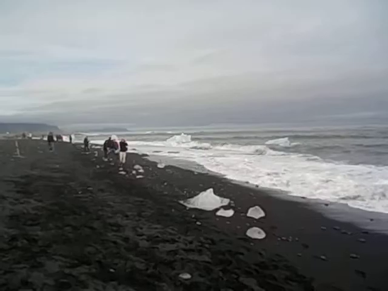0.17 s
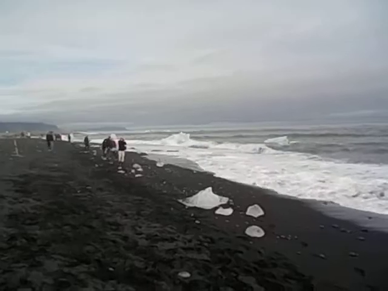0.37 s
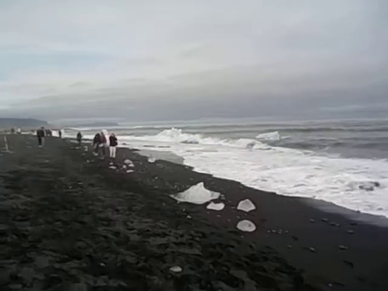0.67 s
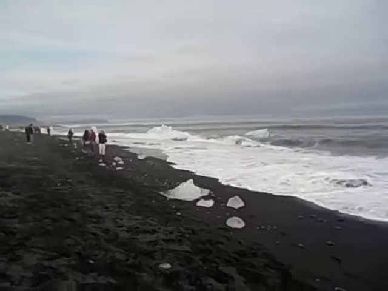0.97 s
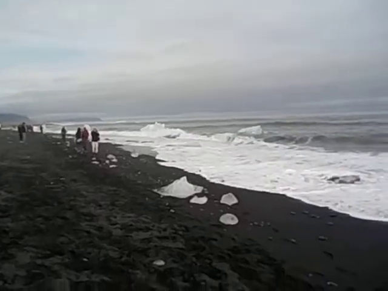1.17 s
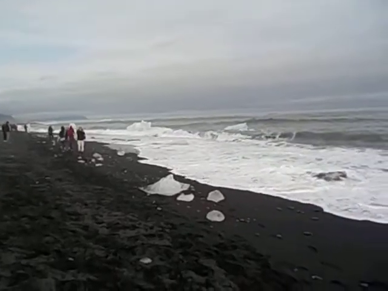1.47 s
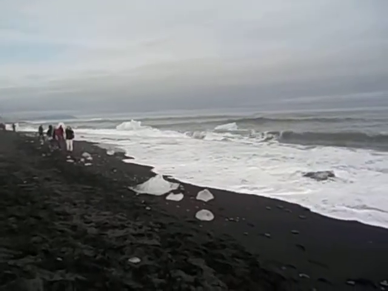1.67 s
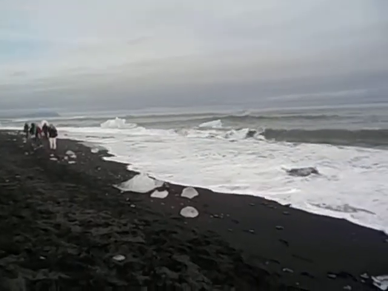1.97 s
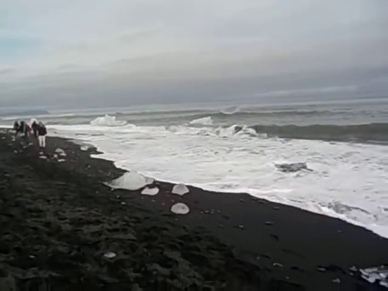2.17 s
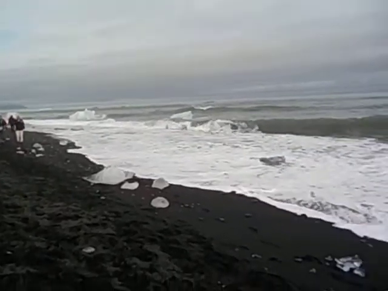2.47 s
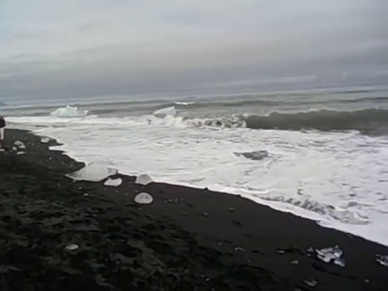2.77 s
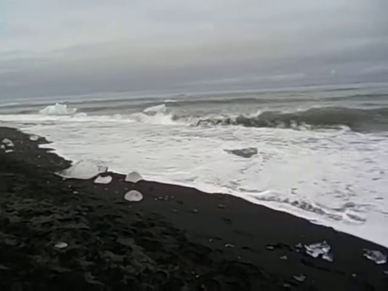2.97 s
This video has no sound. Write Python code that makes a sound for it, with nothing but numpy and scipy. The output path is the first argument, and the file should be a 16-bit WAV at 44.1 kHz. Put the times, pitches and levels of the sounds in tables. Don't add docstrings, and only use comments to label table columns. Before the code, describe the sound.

Ocean surf roars steadily on a sand beach, with foamy wash, fizz and watery slaps.

```python
import sys
import numpy as np
from scipy import signal
from scipy.fft import rfft, irfft
from scipy.io import wavfile
from scipy.ndimage import uniform_filter1d

SR = 44100
rng = np.random.default_rng(int(sys.argv[2]) if len(sys.argv) > 2 else 0)


def ratio_of_db(decibels):
    return 10 ** (np.asarray(decibels, float) / 20)


def unload_audio(sound):
    columns = np.transpose(np.atleast_2d(sound))
    steps = np.round(np.clip(columns, -1, 1) * 32767)
    wavfile.write(sys.argv[1], SR, steps.astype(np.int16))


N = 137151

# (time [s], level [dB])
BREAKER_SURGE = [(.2, -36), (0.271, -32.5), (.42, -35), (.68, -33.5), (.8, -35), (1.0, -36), (1.2, -35.5),
                 (1.28, -34.5), (1.4, -35.5), (1.55, -34), (1.7, -34), (2.15, -34.6), (2.23, -38.5),
                 (2.35, -34), (2.6, -35.5), (2.9, -36), (3.03, -35.5), (3.11, -31.5)]
# (frequency [Hz], density [dB per Hz])
ROAR_SPECTRUM = [(25, -56), (60, -49), (120, -26), (250, -12.5), (450, -2), (750, -.6), (1200, -4.5),
                 (2500, -22.5)]
WASH_SPECTRUM = [(500, -20.5), (1200, -4.5), (2000, -10.5), (2800, -8), (4300, -21.5), (5300, -14),
                 (6300, -22.5), (7700, -37)]
FIZZ_SPECTRUM = [(7700, -34), (8700, -34.5), (9200, -34.5), (11000, -32.5), (13500, -31.5), (14500, -31),
                 (15300, -32.5), (15750, -39)]
# (frequency [Hz], coherence [0-1])
COHERENCE = [(400, .9995), (1000, .996), (1500, .965), (1900, .8), (2300, .96), (3000, .96), (4000, .8),
             (5100, .93)]
COHERENCE_HIGH = [(5100, 1), (6500, .72), (9200, .66), (14000, .66), (15000, .25)]
# (frequency [Hz], phase [rad])
PHASE_LEAD = [(800, .01), (2500, 0.45), (3000, 0.23), (4500, -0.59), (5300, 0.85), (6100, 0.75), (7000, .1),
              (9000, 1)]
# (frequency [Hz], difference [dB])
PORT_BALANCE = [(1000, 0), (1700, 1.7), (2200, -1.8), (2750, -4.5), (3500, -1.5), (4200, -5), (4850, 3.3),
                (5500, 2)]
PORT_BALANCE_HIGH = [(5500, 0), (6400, -6), (7000, -7.5), (9000, -2)]
# (frequency [Hz], width [Hz], amplitude left over [0-1])
NOTCHES = [(1767, 150, 0), (2521, 310, 0.02), (4950, 204, 0.16)]
# (time [s], peak level [dB], pitch [Hz])
WATER_SLAPS = [
    (0.314, -27, 1080),
    (0.502, -28, 880),
    (0.682, -23.5, 1130),
    (1.529, -24, 890),
    (1.632, -26, 754),
    (2.964, -22, 1240),
    (3.032, -24.5, 1140),
    (3.065, -18, 1400),
    (3.088, -24, 1190),
]
# (frequency [Hz], density [dB per Hz])
AMPLIFIER_SPECTRUM = [(30, 9), (150, 25), (400, 22), (1000, 5), (6000, -3), (15700, 1)]

SURGE_SHARE = (1.0, 0.36, 0.16)
DRIFT_DB_PER_S = (-0.7, -0.3, 0.6)
PATCH_DB, FLICKER_DB, SWAY_DB = (.9, 1.1, .7), (.9, 1.0, .6), (.4, .5, .5)
RUMBLE_DRIFT_DB_PER_S, RUMBLE_HZ = -2.5, 208
SPENT_DB, SPENT_S = 1.5, 0.23
WATER_ABOVE_SURGE_DB = 0.5

BUBBLES_PER_S, BUBBLE_SPREAD_DB, BUBBLE_DB = 1500, 2.5, -9
BUBBLE_LOW_HZ, BUBBLE_HIGH_HZ, BUBBLE_CYCLES, BUBBLE_GLIDE = 452, 3520, 4.7, .15
SLAP_CYCLES, SLAP_GAIN_DB, SLAP_LOW_HZ = 2.2, -2.0, 500

LEAD_RAD_PER_KHZ, LEAD_TOP_HZ = .45, 13000
TURN_DB_PER_S, TURN_HZ = -2, 1500
GAP_HZ, GAP_HALF_HZ = 7740, 950
START_S, FADE_END_S, FADE_FROM_DB = 0.072, .22, -39.5
SELF_NOISE_DB = -78


def evened(x):
    return x / np.sqrt(np.mean(x ** 2) + 1e-20)


def read(points, hz, beyond=None):
    f, value = np.transpose(points)
    return np.interp(np.log(hz + 1), np.log(f + 1), value, beyond, beyond)


def blurred(shape, bins, frames):
    z = uniform_filter1d(rng.standard_normal(shape), max(round(bins), 1), axis=0)
    z = uniform_filter1d(z, frames, axis=1)
    return evened(uniform_filter1d(z, frames, axis=1))


def surge(t):
    s, db = np.transpose(BREAKER_SURGE)
    return np.interp(t, s, db) - db.mean()


def water():
    frames, hz = N // 128 + 6, np.fft.rfftfreq(N, 1 / SR)
    t, shape = np.arange(frames) * 128 / SR, (257, frames)
    surge_db = surge(t)
    spent_db = SPENT_DB * np.exp(-abs(t - BREAKER_SURGE[1][0]) / SPENT_S)
    flicker = blurred(shape, bins=60, frames=3)
    sway = blurred(shape, bins=120, frames=18)
    spectrum = 0
    for k, colour in enumerate((ROAR_SPECTRUM, WASH_SPECTRUM, FIZZ_SPECTRUM)):
        patches = blurred(shape, bins=6, frames=12)
        slow_db = SURGE_SHARE[k] * surge_db + DRIFT_DB_PER_S[k] * (t - t.mean())
        if k == 1:
            slow_db = slow_db + spent_db
        uneven_db = PATCH_DB[k] * patches + FLICKER_DB[k] * flicker + SWAY_DB[k] * sway
        real, imaginary = rng.standard_normal((2, 2) + shape)
        z = (real + 1j * imaginary) * ratio_of_db(slow_db + uneven_db)
        layer = signal.istft(z, nperseg=512, noverlap=384)[1][:, :N]
        spectrum = spectrum + rfft(layer) * ratio_of_db(read(colour, hz, -110))
    whole = irfft(spectrum, N)
    rumble = irfft(spectrum / (1 + (hz / RUMBLE_HZ) ** 4), N)
    rumble_gain = ratio_of_db(RUMBLE_DRIFT_DB_PER_S * (np.arange(N) / SR - t.mean()))
    return evened(whole + rumble * (rumble_gain - 1))


def bubbles():
    out = np.zeros((2, N))
    strength = ratio_of_db(BUBBLE_SPREAD_DB * np.minimum(rng.exponential(1, (2, N)), 5))
    bursts = strength * (rng.random((2, N)) < BUBBLES_PER_S / SR)
    kind = rng.integers(0, 30, (2, N))
    for k, hz in enumerate(np.geomspace(BUBBLE_LOW_HZ, BUBBLE_HIGH_HZ, 30)):
        cycles = np.arange(0, 2 * BUBBLE_CYCLES, hz / SR)
        envelope = cycles * np.exp(-3 * cycles / BUBBLE_CYCLES)
        rise = 1 + BUBBLE_GLIDE * cycles / BUBBLE_CYCLES
        ring = envelope * np.sin(2 * np.pi * cycles * rise)
        ring = ring / np.linalg.norm(ring)
        roar, wash = ratio_of_db(read(ROAR_SPECTRUM, hz, -110)), ratio_of_db(read(WASH_SPECTRUM, hz, -110))
        loud = np.hypot(roar, wash) * np.sqrt(hz)
        out += loud * signal.oaconvolve(bursts * (kind == k), ring[None])[:, :N]
    return evened(out) * ratio_of_db(surge(np.arange(N) / SR))


def slaps():
    out = np.zeros(N + SR)
    for s, db, hz in WATER_SLAPS:
        cycles = np.arange(0, 3 * SLAP_CYCLES, hz / SR)
        envelope = cycles * np.exp(1 - 3 * cycles / SLAP_CYCLES) * 3 / SLAP_CYCLES
        ring = envelope * np.sin(2 * np.pi * cycles)
        out[round(s * SR):][:len(ring)] += ratio_of_db(db + SLAP_GAIN_DB) * ring
    bass_cut = signal.butter(4, SLAP_LOW_HZ, 'high', fs=SR, output='sos')
    return signal.sosfilt(bass_cut, out[:N])


def ports(fields):
    hz, (a, b) = np.fft.rfftfreq(N, 1 / SR), rfft(fields)
    same = np.clip(read(COHERENCE, hz) * read(COHERENCE_HIGH, hz), 0, 1)
    last_hz = PHASE_LEAD[-1][0]
    lead = read(PHASE_LEAD, hz) + LEAD_RAD_PER_KHZ * (np.clip(hz, last_hz, LEAD_TOP_HZ) - last_hz) / 1000
    tilt = ratio_of_db((read(PORT_BALANCE, hz) + read(PORT_BALANCE_HIGH, hz)) / 2)
    left = a * tilt
    right = (same * np.exp(1j * lead) * a + np.sqrt(1 - same ** 2) * b) / tilt
    return irfft(np.array([left, right]), N)


def turned(left, right):
    hz, t = np.fft.rfftfreq(N, 1 / SR), np.arange(N) / SR
    low_side = irfft(rfft(left - right) / 2 / (1 + (hz / TURN_HZ) ** 4), N)
    change = low_side * (ratio_of_db(TURN_DB_PER_S * (t - t.mean())) - 1)
    return np.array([left + change, right - change])


def self_noise(gap):
    hz = np.fft.rfftfreq(N, 1 / SR)
    noise = rfft(rng.standard_normal(N)) * gap * ratio_of_db(read(AMPLIFIER_SPECTRUM, hz))
    return ratio_of_db(SELF_NOISE_DB) * evened(irfft(noise, N))


def scene():
    level = ratio_of_db(np.mean(np.transpose(BREAKER_SURGE)[1]) + WATER_ABOVE_SURGE_DB)
    surf = level * (water() + ratio_of_db(BUBBLE_DB) * bubbles())
    left, right = ports(surf + slaps())
    return turned(left, right)


def low_pass(x):
    return signal.sosfilt(signal.butter(12, 16370, fs=SR, output="sos"), x)


def record(dry):
    hz, t, z = np.fft.rfftfreq(N, 1 / SR), np.arange(N) / SR, rfft(dry)
    for notch_hz, width_hz, left_over in NOTCHES:
        off = 2j * (hz - notch_hz) / width_hz
        z = z * (off + left_over) / (off + 1)
    away = ((hz - GAP_HZ) / GAP_HALF_HZ) ** 6
    gap = away / (1 + away) * (hz < FIZZ_SPECTRUM[-1][0])
    fade = ratio_of_db(np.interp(t, [START_S, FADE_END_S], [FADE_FROM_DB, 0]))
    mix = irfft(z * gap, N) * fade + self_noise(gap)
    return low_pass(mix * (t > START_S))


dry = scene()
out = record(dry)
unload_audio(out)
```